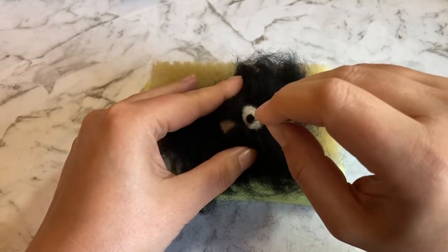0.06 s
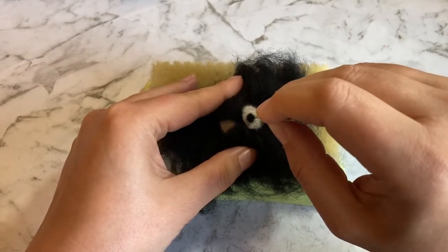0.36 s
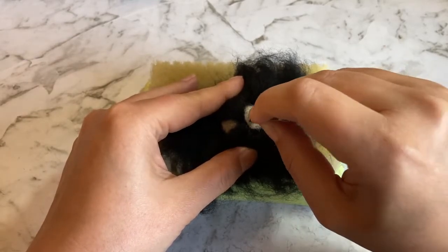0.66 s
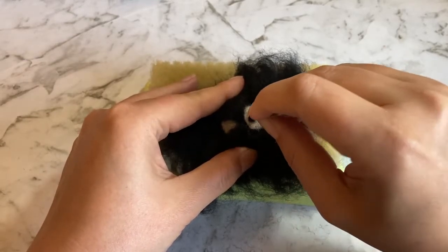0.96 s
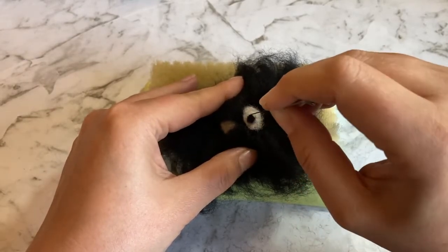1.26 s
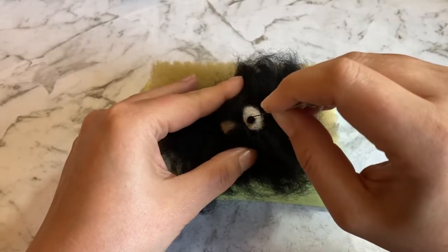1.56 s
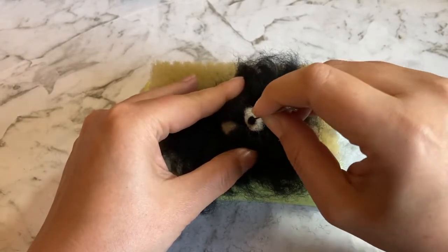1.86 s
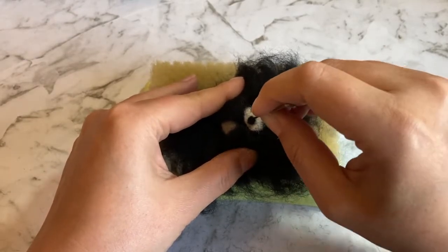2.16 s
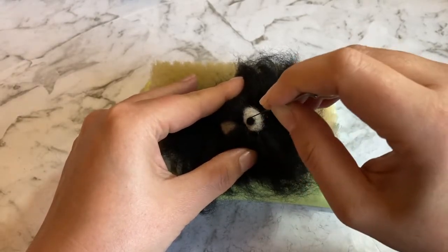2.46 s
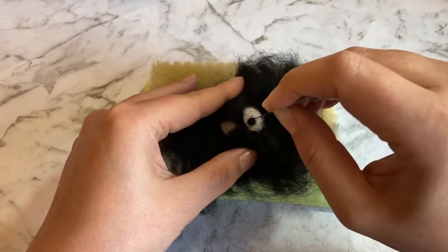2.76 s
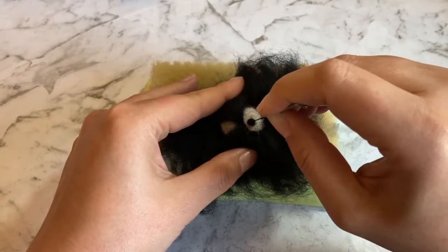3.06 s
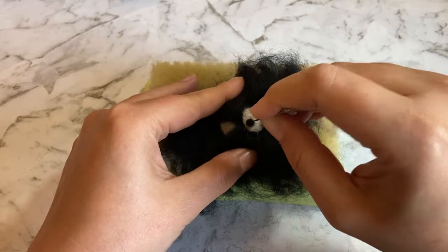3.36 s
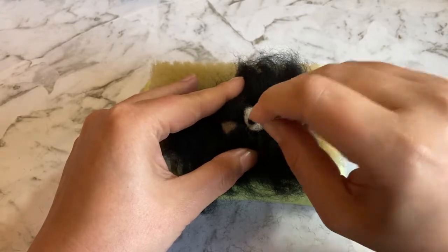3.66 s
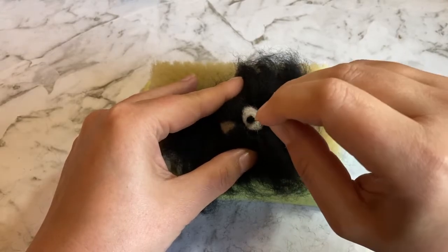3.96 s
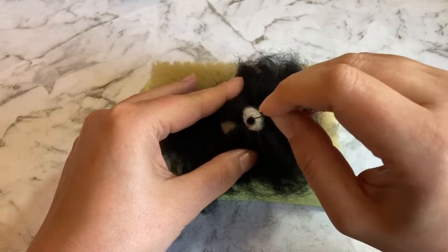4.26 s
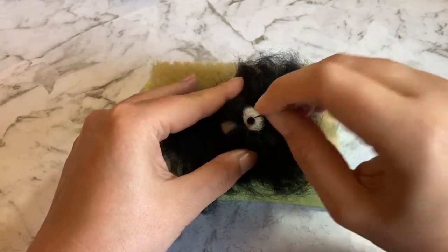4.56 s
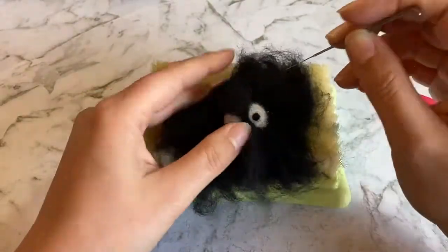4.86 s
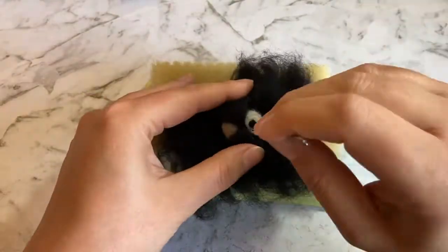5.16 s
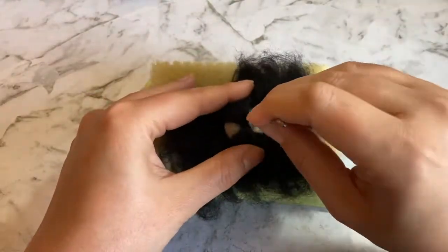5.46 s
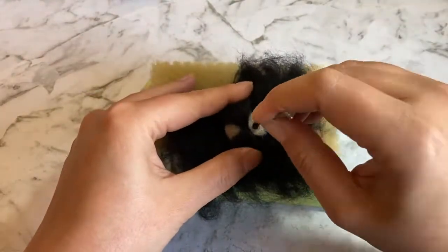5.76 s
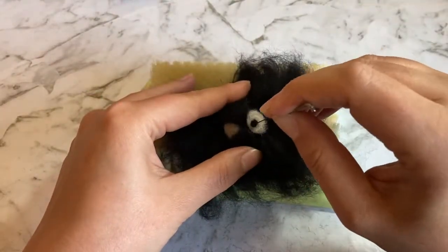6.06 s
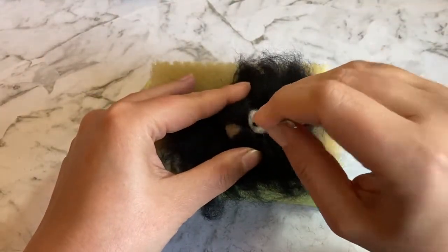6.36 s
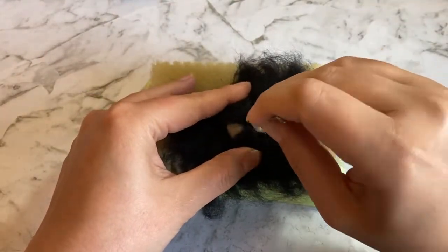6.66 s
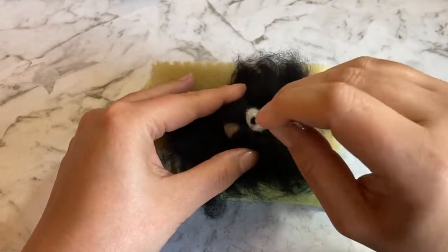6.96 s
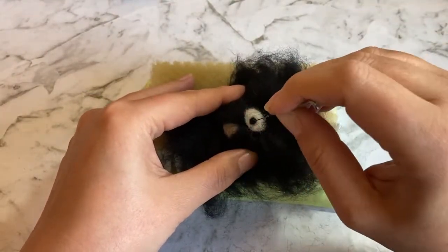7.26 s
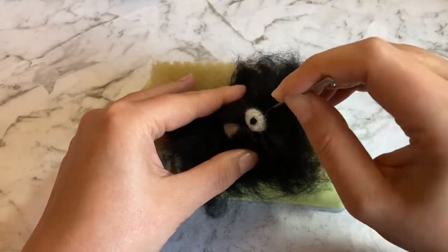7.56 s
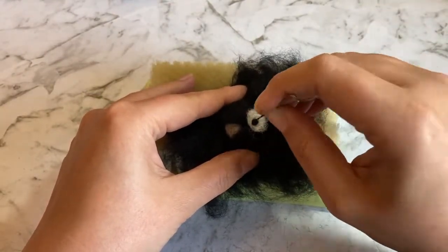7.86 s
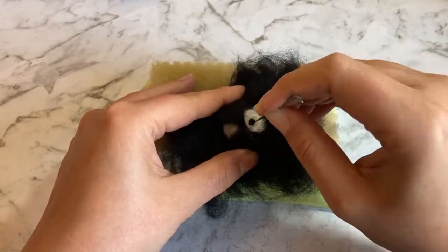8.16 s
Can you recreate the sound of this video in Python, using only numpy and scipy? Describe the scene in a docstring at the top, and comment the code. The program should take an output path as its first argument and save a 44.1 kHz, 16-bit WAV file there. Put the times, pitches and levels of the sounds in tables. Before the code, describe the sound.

Close, dry crunching of a barbed needle stabbing wool over foam, slow and crackly at first, then faster with dull little thuds.

```python
"""Needle felting, close up

A barbed needle is worked into wool on a foam pad on a table, in a quiet room. Three slow, rustling
stabs come first, then eleven quick ones that crunch and thump the pad. Each stab is two strokes,
in and out: the barbs snap through fibres, then the smooth shaft slides with a soft hiss."""
import sys
import numpy as np
from scipy import signal
from scipy.fft import rfft, irfft, next_fast_len
from scipy.io import wavfile
from scipy.ndimage import uniform_filter1d

SR = 44100
rng = np.random.default_rng(int(sys.argv[2]) if len(sys.argv) > 2 else 0)


def output_pcm(signal):
    """Save a mono or channel-first signal as 16-bit PCM at the path in sys.argv[1].

    Samples are clipped to [-1, 1] before scaling.
    """
    pcm = np.clip(np.atleast_2d(signal).T, -1, 1) * 32767
    wavfile.write(sys.argv[1], SR, np.round(pcm).astype(np.int16))


N = 362590
LOUDER_FROM_S = 3.44   # the background steps up here
CUTOFF_HZ = 15900   # the top of the treble

# Levels in all tables are relative: the functions add their own gains.
# slow stabs: push grips t/s, push is through t/s, its force climb/(dB/s), push level/dB,
# pull grips t/s, pull is through t/s, pull level/dB
SLOW_STABS = [(0.568, 0.622, 250, -41, 0.833, 0.855, -35), (1.792, 1.845, 145, -44.3, 2.042, 2.076, -38.7),
              (3.177, 3.224, 215, -42, 3.404, 3.423, -35.3)]
# quick stabs: in t/s, half length going in/s, in level/dB, out t/s, out level/dB, thump level/dB
QUICK_STABS = [(3.6, .007, -37.5, 3.658, -34, -28.5), (4.073, .0055, -36, 4.132, -36, -28.5),
               (4.457, .0052, -34, 4.52, -34.5, -31.5), (5.434, .0055, -37, 5.487, -35, -30.5),
               (5.747, .005, -31.5, 5.802, -30.5, -31), (6.312, .0065, -32.5, 6.374, -32, -30),
               (6.63, .0053, -40.5, 6.69, -32.5, -30.5), (7.015, .0046, -34.5, 7.066, -37.5, -29),
               (7.409, .0052, -39, 7.462, -43, -31), (7.778, .0058, -33.5, 7.833, -37, -35),
               (8.132, .0068, -45, 8.189, -40.5, -33)]
# tone of the dull rustle of wool and pad in slow work: f/Hz, level/dB
SLOW_BODY = [(30, -2), (85, 2), (125, -6), (190, 0.5), (270, -2.5), (330, -7), (500, -9.5), (700, -27.5),
             (1100, -25.5), (2000, -32.5), (2600, -94), (8000, -55)]
# tone of fibres snapping in slow work: f/Hz, level/dB
SLOW_FIBRES = [(300, -46), (1500, -1), (2000, -3.5), (2500, -10), (3000, -1), (3900, -5.5), (5200, 2),
               (7200, 3), (9200, 1), (10500, -10), (13000, -10.5), (15500, -27)]
# tone of fibres tearing in quick work: f/Hz, level/dB
QUICK_FIBRES = [(300, -8), (1500, 15), (2900, -1), (3550, 1), (4100, 5.5), (7500, 0.5), (10500, -4),
                (12500, 3), (15500, -2)]
# very deep tone of the swaying pad and of the early rumble: f/Hz, level/dB
SWAY = [(8, -1), (16, 7.5), (26, -1.5), (36, -17.5), (55, -27), (120, -32.5), (400, -80)]
# low resonances of the pad, heard as a knock: f/Hz, width/Hz, level/dB
KNOCK_MODES = [(254, 150, -3.5), (402, 52, -1), (552, 118, -6.5), (722, 69.6, 2), (1020, 85, 1)]
# higher resonances, heard as a rasp: f/Hz, width/Hz, level/dB
RASP_MODES = [(1487, 247, 5.5), (1850, 354, 7), (2056, 610, -7.5)]
RUSTLE_CLIMB_DB_PER_S, CRACKLE_FALL_DB_PER_S = 750, 1050   # in slow stabs; the climb is the pull's


def from_db(db):
    """Turn decibels into a gain to multiply by."""
    return 10 ** (np.asarray(db) / 20)


def rms_one(x):
    """Scale a signal so that its average strength (rms) is 1."""
    return x / np.sqrt(np.mean(x ** 2) + 1e-20)


def clock():
    """The time of every sample, in seconds."""
    return np.arange(N) / SR


def colour(x, spectrum):
    """Filter a sound to the tone given as (f/Hz, level/dB) rows; white noise keeps its power."""
    size = 2 * next_fast_len(N // 2 + SR // 2)
    hz, db = np.transpose(spectrum)
    grid = np.maximum(np.arange(size // 2 + 1) * SR / size, 1)
    gain = from_db(np.interp(np.log(grid), np.log(hz), db)) / (1 + (grid / CUTOFF_HZ) ** 60)
    # make the filter minimum-phase, so that nothing rings ahead of a click
    cepstrum = irfft(np.log(rms_one(gain)))
    cepstrum[1:size // 2] *= 2
    cepstrum[size // 2 + 1:] = 0
    return irfft(rfft(x, size) * np.exp(rfft(cepstrum)))[:N]


def resonate(x, modes):
    """Ring resonances side by side, with alternating signs; white noise keeps about its power."""
    out, power = 0, 0
    for k, (hz, width, db) in enumerate(modes):
        r = np.exp(-np.pi * width / SR)
        poles = [1, -2 * r * np.cos(2 * np.pi * hz / SR), r * r]
        ringing = signal.lfilter([(1 - r * r) / 2, 0, (r * r - 1) / 2], poles, x + 1e-18)
        out = out + (-1) ** k * from_db(db) * ringing
        power += from_db(db) ** 2 * np.pi * width / SR
    return out / np.sqrt(power)


def noise(spectrum):
    """Steady noise with the given tone, at strength 1."""
    return rms_one(colour(rng.standard_normal(N), spectrum))


def clicks(times, levels_db):
    """A one-sample click at each of the times."""
    out = np.zeros(N)
    out[np.clip((np.asarray(times) * SR).astype(int), 0, N - 1)] = from_db(levels_db)
    return out


def at_random(per_s):
    """Mark random samples, about so many each second."""
    return rng.random(N) < per_s / SR


def swells(times, rises, falls, levels_db, roundness):
    """A swell of force at each time, round on top and fading on both sides; rises and falls in s."""
    power, t = np.zeros(N), clock()
    for s, rise, fall, db in np.broadcast(times, rises, falls, levels_db):
        near = slice(max(int((s - 20 * rise) * SR), 0), int((s + 20 * fall) * SR))
        from_peak = (t[near] - s) / np.where(t[near] < s, rise, fall)
        power[near] += from_db(db) ** 2 * np.exp(roundness ** 2 - roundness * np.hypot(roundness, from_peak))
    return np.sqrt(power)


def grips(starts, ends, climbs, falls, levels_db):
    """Force in dB: it climbs until the barbs grip, holds, then falls; climbs and falls in dB per s."""
    out, t = np.full(N, -200.), clock()
    for start, end, climb, fall, db in np.broadcast(starts, ends, climbs, falls, levels_db):
        near = slice(max(int((start - .5) * SR), 0), int((end + .5) * SR))
        shape = db - climb * np.maximum(start - t[near], 0) - fall * np.maximum(t[near] - end, 0)
        out[near] = np.maximum(out[near], shape)
    return out


def held_to(x, force, span_s):
    """Make a sound's loudness follow the force that drives it, keeping its fine grain."""
    size = int(span_s * SR) + 1
    wanted, present = uniform_filter1d(uniform_filter1d(np.array([force, x]) ** 2, size), size)
    return x * np.sqrt((np.abs(wanted) + 1e-12) / (np.abs(present) + 1e-12))


def background():
    """Quiet room air over a deep rumble; at 3.44 s it steps up: more hiss, more rumble, a faint whine."""
    early_air_tone = [(20, 10.5), (60, -5), (90, -1.5), (180, -8), (330, -7.5), (395, 0), (440, -13),
                      (600, -11), (1000, -18), (3200, -27), (12000, -32.5), (16000, -50.5)]   # room air before the step: f/Hz, level/dB
    late_air_tone = [(100, -6.5), (180, -7), (250, -11), (320, -7.5), (400, -15.5), (520, -14.5),
                     (650, -21), (1500, -25.5), (2200, -29), (4000, -34.5), (6500, -37.5), (8600, -41),
                     (13500, -48.5), (16000, -52)]   # room air after the step: f/Hz, level/dB
    rumble_tone = [(12, -9.5), (25, 4.5), (52, -1), (70, -5.5), (100, -14.5), (150, -20.5), (220, -42.5),
                   (500, -63.5)]   # deep rumble after the step: f/Hz, level/dB
    rumble_swing = [(3.44, -41), (3.97, -46), (4.45, -44), (4.86, -51), (5.9, -44), (6.16, -47),
                    (6.83, -44), (8.22, -45)]   # how that rumble rises and falls: t/s, level/dB
    t, whine_hz = clock(), 1592
    early = from_db(-68) * noise(early_air_tone) + from_db(-45.5) * noise(SWAY)
    swing_s, swing_db = np.transpose(rumble_swing)
    rumble = from_db(-44.3 + np.interp(t, swing_s, swing_db - swing_db.mean())) * noise(rumble_tone)
    haze = from_db(-80) * resonate(rng.standard_normal(N), [(whine_hz, 110, 0)])
    whine = from_db(-83) * rms_one(np.sin(2 * np.pi * whine_hz * t))
    late_air = from_db(-65.8) * noise(late_air_tone)
    late = np.clip((t - LOUDER_FROM_S) / .02 + .5, 0, 1)
    return (1 - late) * early + late * (late_air + rumble + haze + whine)


def fingers():
    """Fingers rub softly as they shift the felt."""
    rubs = [(4.621, 0.018, -58.5), (4.736, 0.0069, -60.5), (4.863, 0.015, -60.5), (6.052, 0.0058, -63)]   # each rub: t/s, half length/s, level/dB
    rub_tone = [(100, -19), (300, 4.5), (520, -4), (900, 1.5), (1300, -19), (3000, -25.5), (16000, -32)]   # fingers on felt: f/Hz, level/dB
    s, half, db = np.transpose(rubs)
    return noise(rub_tone) * swells(s, half, half, db, roundness=1.9)


def loose_fibres():
    """Fibres tick at random; in quick work the wool also stirs, and the tip grazes it before each stab."""
    busy = clock() > LOUDER_FROM_S
    stirs = busy * at_random(per_s=4)
    stir_db = -67.5 + 3 * rng.uniform(-1, 1, N)
    stir = swells(clock()[stirs], .0041, .0025, stir_db[stirs], roundness=1.05)
    graze_s = np.transpose(QUICK_STABS)[0] - .029
    graze = swells(graze_s, .0041, .0025, levels_db=-67, roundness=1.05)
    stirring = resonate(rng.standard_normal(N) * (stir + graze), [(1010, 360, 11), (1780, 1300, 3.5)])
    slow_ticks = ~busy * at_random(per_s=4) * from_db(-56 + 4 * rng.uniform(-1, 1, N))
    quick_ticks = busy * at_random(per_s=8) * from_db(-55 + 5 * rng.uniform(-1, 1, N))
    return stirring + colour(quick_ticks, QUICK_FIBRES) + colour(slow_ticks, SLOW_FIBRES)


def flicks():
    """The tip lets go of a fibre with a tick and a tiny knock, after each quick stab and at times between."""
    snags = [(3.99, -61, -12), (4.396, -60, -3), (4.559, -56, 4), (6.0508, -50, -11)]   # further ticks of the tip letting go, mostly between stabs, one a louder release just after a stab: t/s, level/dB, extra for the knock/dB
    out_s = np.transpose(QUICK_STABS)[3]
    time_jitter, level_jitter = rng.uniform(-1, 1, (len(out_s), 2)).T
    release_s = out_s + .043 + .004 * time_jitter   # the tip leaves the wool
    releases = clicks(release_s, -63 + 3 * level_jitter)
    s, db, knock_db = np.transpose(snags)
    knocks = from_db(30.5) * (clicks(s, db + knock_db) + from_db(-9) * releases)
    ticks = from_db(17) * (clicks(s, db) + releases)
    return colour(ticks, QUICK_FIBRES) + resonate(knocks, KNOCK_MODES) + .13 * resonate(knocks, RASP_MODES)


def fibre_breaks(per_s, spread_db, friction, even_s):
    """Random snaps of uneven size over smooth rubbing noise, evened out to strength 1."""
    sizes = from_db(spread_db * np.minimum(rng.exponential(1, N), 4)) * rng.choice([-1, 1], N)
    grains = rms_one(sizes * at_random(per_s)) + friction * rng.standard_normal(N)
    return grains / np.sqrt(np.maximum(uniform_filter1d(grains ** 2, int(even_s * SR) + 1), 1e-9))


def catches(per_s, depth_db):
    """An uneven gain: the wool grips and lets go so many times a second."""
    times = np.cumsum(rng.uniform(.5, 1.5, 8000)) / per_s
    grip = rng.uniform(-1, 1, len(times))
    return rms_one(from_db(depth_db * np.interp(clock(), times, grip)))


def rocking(times, levels_db, modes, soft_hz, uneven_db):
    """Each stroke shoves the pad, which rocks at a few low pitches; the foam softens the push."""
    out, chance = 0, rng.standard_normal((len(times), len(modes)))
    for k, (hz, db, ring_s, lag_s) in enumerate(modes):
        r, w = from_db(-60 / (ring_s * SR)), 2 * np.pi * hz / SR
        push = clicks(times + lag_s, levels_db + db + uneven_db * chance[:, k])
        out = out + signal.lfilter([0, np.sin(w)], [1, -2 * r * np.cos(w), r * r], push + 1e-18)
    return signal.sosfilt(signal.butter(2, soft_hz, fs=SR, output="sos"), out)


def slow_force(pull_climb, fall):
    """The force of the slow pushes and pulls, in dB; the pull's climb and the fall are in dB per s."""
    push, push_end, climb, push_db, pull, pull_end, pull_db = np.transpose(SLOW_STABS)
    pushing = grips(push, push_end, climb, fall, push_db)
    pulling = grips(pull, pull_end, pull_climb, fall, pull_db)
    return np.maximum(pushing, pulling)


def slow_slides():
    """The smooth shaft hisses through the wool after slow strokes; later comes one light brush over it."""
    _, push_end, _, _, pull, pull_end, _ = np.transpose(SLOW_STABS)
    # the last pull has no slide after it
    s = np.r_[(push_end + pull) / 2, pull_end[:-1] + .108]
    shaft = from_db(grips(s - .021, s + .021, climbs=520, falls=520, levels_db=-68.5))
    brush = swells(times=5.182, rises=.016, falls=.016, levels_db=-74.5, roundness=9.1)
    hiss = rng.standard_normal(N) * (shaft + brush)
    return colour(hiss, SLOW_FIBRES) + from_db(5.5) * colour(hiss, SLOW_BODY)


def slow_snaps():
    """Single fibres snap in the slow work: a few at set times, and random ones that grow with the force."""
    loud_snaps = [(0.2753, -58.5), (0.379, -53), (0.4759, -55.5), (0.832, -39), (1.0267, -53.5),
                  (2.0367, -42), (3.0991, -50)]   # the loudest single fibres: t/s, level/dB
    force_db = slow_force(RUSTLE_CLIMB_DB_PER_S, CRACKLE_FALL_DB_PER_S)
    size_db = -49.5 + .45 * (force_db - force_db.max()) + 3 * rng.uniform(-1, 1, N)
    small_snaps = at_random(per_s=55) * from_db(size_db)
    snaps = from_db(10.5) * (clicks(*np.transpose(loud_snaps)) + small_snaps)
    return colour(snaps, SLOW_FIBRES) + from_db(6.5) * colour(snaps, SLOW_BODY)


def slow_stabs():
    """Barbs creep through the wool in small catches over a dull rustle, then the pad sways back."""
    tip_touches = [(0.384, -55.5, -77), (1.642, -62, -82), (2.366, -67, -73.5), (2.893, -58, -68),
                   (2.932, -54, -70), (3.004, -59, -83), (3.11, -54, -80)]   # the tip feels for its place: t/s, rustle level/dB, crackle level/dB
    pad_modes = [(23.8, 9, 0.16, 0.001), (47.2, -8, 0.24, 0.0052), (83, -4, 0.1, 0.0036)]   # pad and table rocking: f/Hz, level/dB, time to fade 60 dB/s, lag/s
    _, push_end, _, _, _, pull_end, _ = np.transpose(SLOW_STABS)
    touch_s, touch_db, scratch_db = np.transpose(tip_touches)
    touches = swells(touch_s, .007, .009, touch_db, roundness=2.5)
    scratches = swells(touch_s, .007, .009, scratch_db + 2.5, roundness=2.5)
    breaks = fibre_breaks(per_s=450, spread_db=2.5, friction=.4, even_s=.022)
    breaks *= catches(per_s=150, depth_db=6.5)
    drag = from_db(slow_force(RUSTLE_CLIMB_DB_PER_S, fall=680) + 1.2) + touches
    rustle = held_to(colour((breaks + rng.standard_normal(N)) * drag, SLOW_BODY), drag, span_s=.074)
    # once the needle halts, the crackle dies sooner than the dull rustle
    force_db = slow_force(pull_climb=560, fall=CRACKLE_FALL_DB_PER_S)
    crackle_gain = from_db(-49 + .98 * (force_db - force_db.max()))
    crackle = colour(breaks * (crackle_gain + scratches), SLOW_FIBRES)
    lean = np.hypot(swells(push_end - .012, .042, .06, levels_db=-28, roundness=2.8),
                    swells(pull_end, .022, .075, levels_db=-30, roundness=2.2))
    sway = held_to(noise(SWAY) * lean, lean, span_s=.15)
    rock = rocking(np.r_[push_end, pull_end] - .011, -31.5, pad_modes, soft_hz=94, uneven_db=1.4)
    return rustle + crackle + sway + rock


def quick_slides():
    """The tip parts the surface wool; the shaft slides between the two strokes and again as it leaves."""
    slide_tone = [(150, 30), (450, 17), (1000, 15), (1900, 11), (2700, -1), (7500, -2.5), (10500, -2),
                  (15500, -1)]   # the shaft sliding in wool: f/Hz, level/dB
    in_s, _, _, out_s, _, _ = np.transpose(QUICK_STABS)
    entry = swells(in_s - .015, .01, .007, levels_db=-66.5, roundness=1.2)
    deep = swells((in_s + out_s) / 2 + .002, .005, .005, levels_db=-62.5, roundness=6)
    leaving = swells(out_s + .036, .009, .0045, levels_db=-64.5, roundness=5.5)
    loose_wool = fibre_breaks(per_s=250, spread_db=6, friction=.35, even_s=.02)
    fine_wool = fibre_breaks(per_s=1500, spread_db=2.5, friction=.6, even_s=.01)
    slide = colour(rng.standard_normal(N) * (deep + leaving) + loose_wool * entry, slide_tone)
    return slide + from_db(-5) * colour(fine_wool * (deep + leaving), QUICK_FIBRES)


def quick_stabs():
    """Barbs tear through in about 10 ms, catching as they go, and make the pad ring; a thump follows."""
    thud_tone = [(25, -18), (50, 0), (95, 2), (135, -7), (190, -23), (500, -46), (2000, -87)]   # the pad's dull thud: f/Hz, level/dB
    pad_modes = [(26.34, 5, 0.34, 0.01284), (51.5, -1.5, 0.2, .003), (91, 6, 0.084, 0.00088)]   # pad and table rocking: f/Hz, level/dB, time to fade 60 dB/s, lag/s
    in_s, in_half, in_db, out_s, out_db, stab_thump_db = np.transpose(QUICK_STABS)
    s, knock_db = np.r_[in_s, out_s], np.r_[in_db, out_db]
    half = np.r_[in_half, np.full(len(out_s), .0042)]   # half lengths in s; the pull is always brisk
    climb_db_per_s = np.repeat([1150, 3400], len(in_s))   # going in, coming out
    swing_db = knock_db - knock_db.mean()   # how much harder than average each stroke is
    breaks = fibre_breaks(per_s=3000, spread_db=1.5, friction=.65, even_s=.0046)
    breaks *= catches(per_s=350, depth_db=5.2)
    grip_s = np.r_[in_s - .8 * in_half, out_s - .007]
    tear_db = grips(grip_s, s + .6 * half, climb_db_per_s, falls=2200, levels_db=-51.2 + .33 * swing_db)
    crunch = colour(breaks * from_db(tear_db), QUICK_FIBRES)
    rasp_db = -44.3 + .55 * swing_db
    # the felt muffles everything above each group of resonances
    for modes, db, muffle_hz in (KNOCK_MODES, knock_db + 1.3, 1300), (RASP_MODES, rasp_db, 2700):
        force = swells(s - .0013, half * .74, half * .58, db, roundness=1.9)
        felt = signal.butter(4, muffle_hz, fs=SR, output="sos")
        ringing = signal.sosfilt(felt, resonate(breaks * force, modes))
        crunch += held_to(ringing, force, span_s=.02)
    # the harder stroke of a pair takes more of the thump
    thump_db = np.tile(stab_thump_db, 2) + .3 * np.r_[in_db - out_db, out_db - in_db]
    push = swells(s + .0028, half * 1.13, half * 2.43, thump_db - 3, roundness=.94)
    thud = held_to(noise(thud_tone) * push, push, span_s=.025)
    return crunch + thud + rocking(s, thump_db + 1, pad_modes, soft_hz=220, uneven_db=.9)


def scene():
    """Everything is close and free of echo, in one channel."""
    slow_work = slow_stabs() + slow_slides() + slow_snaps()
    quick_work = quick_stabs() + quick_slides() + flicks()
    return (slow_work + quick_work + fingers() + loose_fibres() + background())[None]


def record(dry):
    """The microphone passes no steady pressure, and the highest treble is cut steeply."""
    moving = signal.sosfilt(signal.butter(1, 10, "high", fs=SR, output="sos"), dry)
    return signal.sosfilt(signal.ellip(10, .1, 80, CUTOFF_HZ, fs=SR, output="sos"), moving)


dry = scene()
out = record(dry)
output_pcm(out)
```